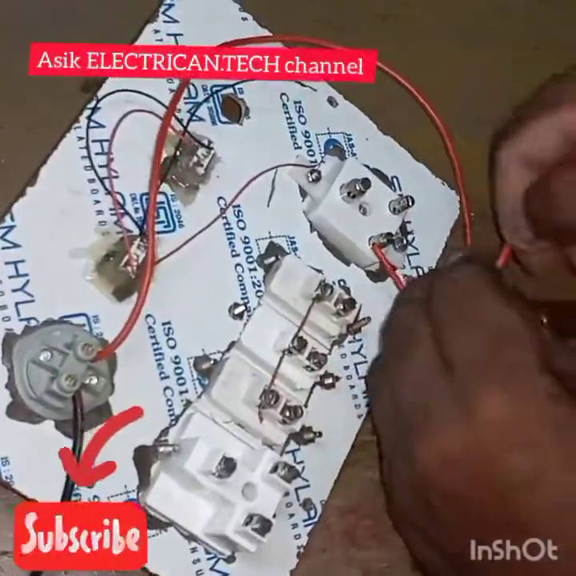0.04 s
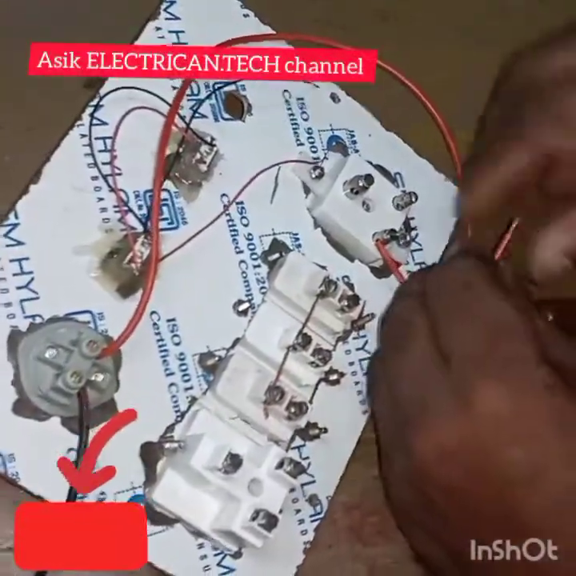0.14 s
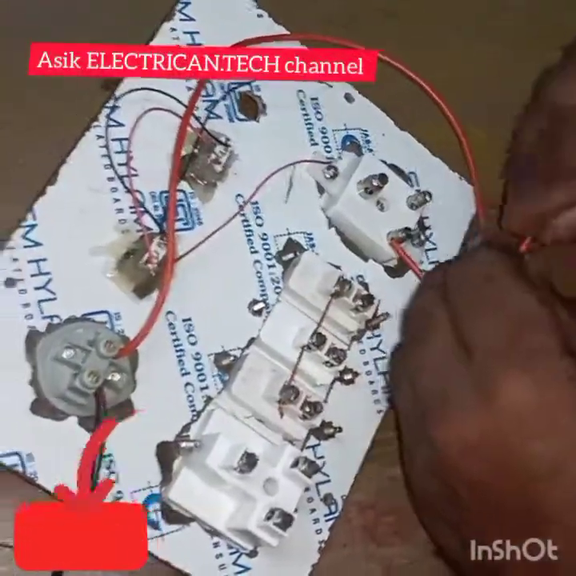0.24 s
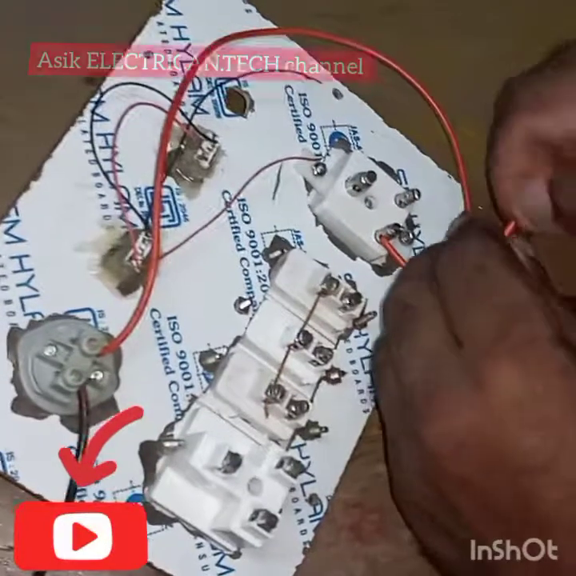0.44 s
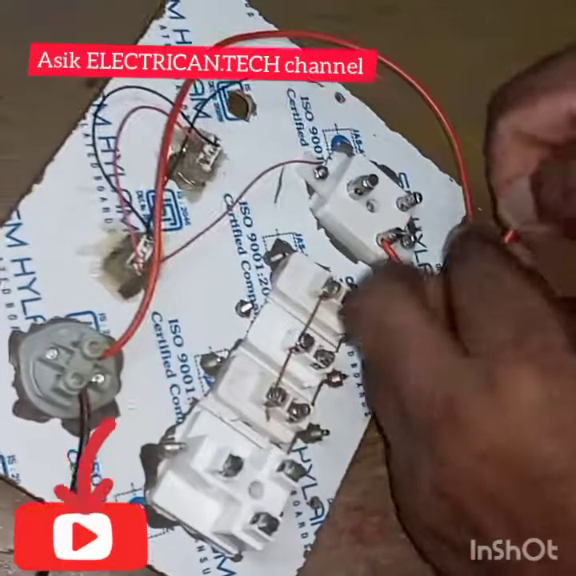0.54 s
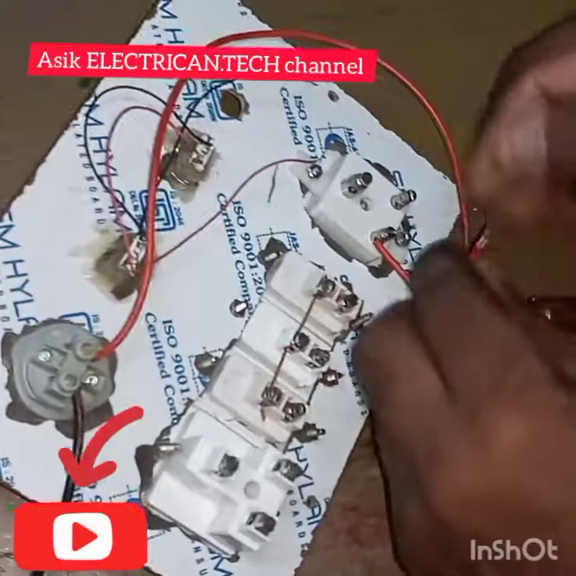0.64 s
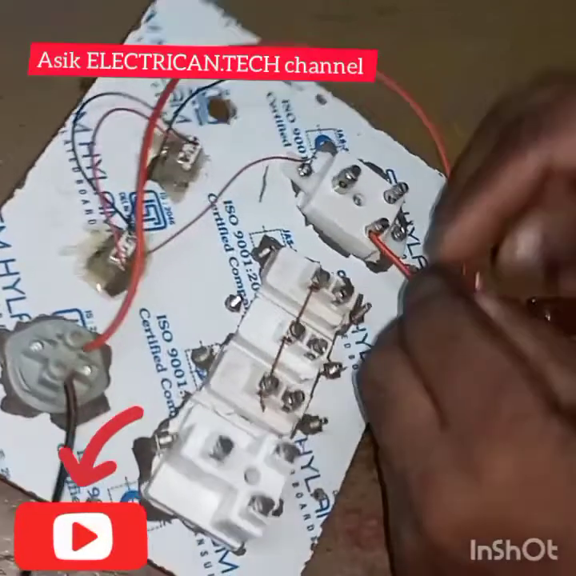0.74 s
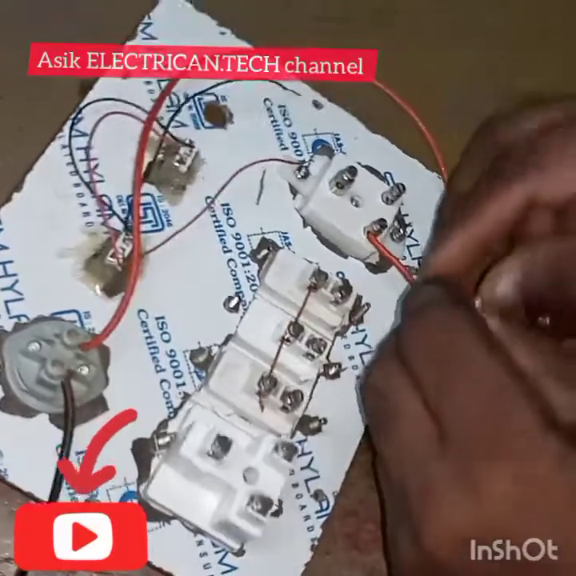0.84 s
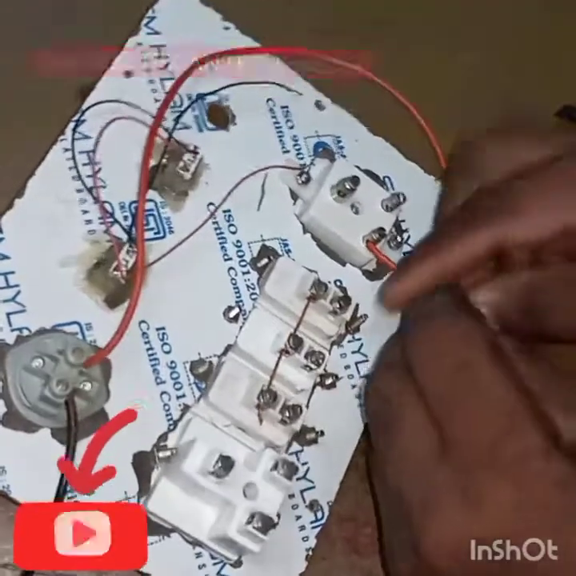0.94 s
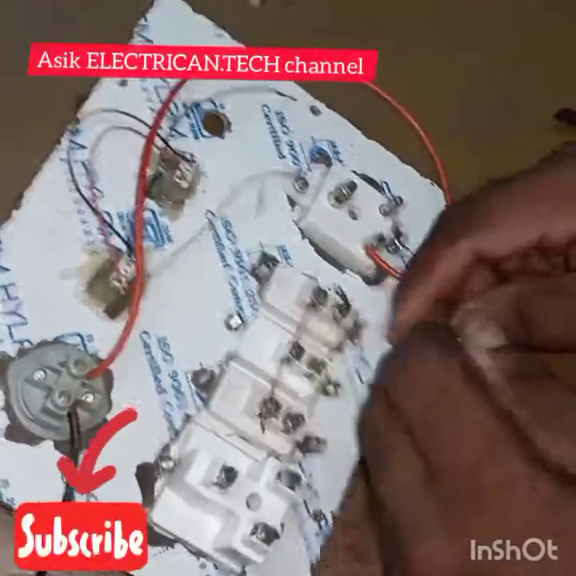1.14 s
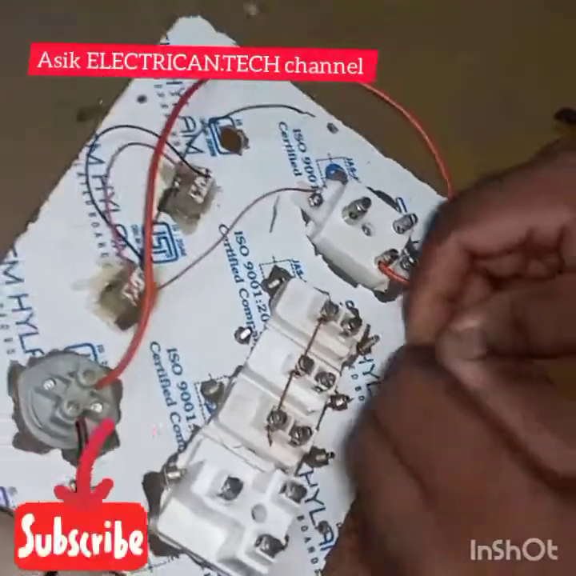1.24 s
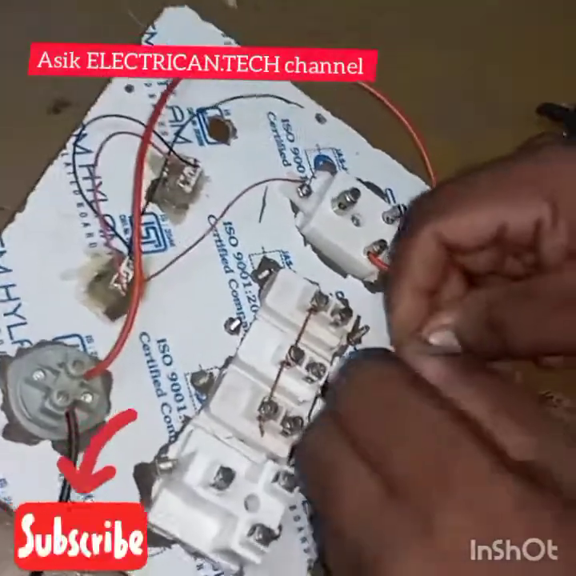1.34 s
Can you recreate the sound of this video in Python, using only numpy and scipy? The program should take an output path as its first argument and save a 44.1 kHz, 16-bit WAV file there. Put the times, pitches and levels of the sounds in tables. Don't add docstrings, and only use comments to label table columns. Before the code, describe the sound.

A stiff wire clicks and scrapes on a screw terminal, close up in a small bare room. Faint hiss and a dying clatter tail come first; a bright scrape and snaps at 0.2 seconds, a sharp tick at 0.39, then a dense burst of ticks, rasps and boomy table knocks from 0.57 to 0.9. Soft thumps fade until 1.2; faint ticks and rubbing near 1.35.

```python
import sys
import numpy as np
from scipy import signal
from scipy.fft import rfft, irfft
from scipy.io import wavfile
from scipy.ndimage import uniform_filter1d

SR = 44100
rng = np.random.default_rng(int(sys.argv[2]) if len(sys.argv) > 2 else 0)


def makeup_ratio(level_db):
    decades = np.asarray(level_db, float) / 20
    return 10 ** decades


def file_out(sig):
    cols = np.atleast_2d(sig).T
    lim = np.clip(cols, -1, 1)
    pcm = np.round(lim * 32767).astype(np.int16)
    wavfile.write(sys.argv[1], SR, pcm)


N = 61739
T = np.arange(N) / SR


def colour(x, points, sign=1):
    hz, db = np.array(points, float).T
    grid = np.arange(1025) * SR / 2048
    curve = np.interp(np.log(grid + 1), np.log(hz), db)
    cepstrum = irfft(sign * curve * np.log(10) / 20)
    cepstrum[1:1024] *= 2
    cepstrum[1025:] = 0
    response = irfft(np.exp(rfft(cepstrum)))
    return signal.fftconvolve(x, response)[:len(x)]


def resonate(x, hz, width):
    b, a = signal.iirpeak(hz, hz / width, SR)
    return signal.lfilter(b, a, signal.lfilter(b, a, x))


def dull(x, hz):
    return signal.lfilter(*signal.butter(2, hz, fs=SR), x)


def unit(x):
    return x / np.sqrt(np.mean(x ** 2))


def add(track, sound, s):
    i = int(s * SR)
    track[i:i + len(sound)] += sound[:len(track) - i]


# (frequency [Hz], level [dB per Hz])
HISS = [(30, -3.5), (150, -9), (800, -23), (3800, -25), (7400, -8.5), (9200, -27), (13000, -38),
        (15200, -41)]
HISS_DB, FLICKER_DB = -57, 1.2


def hiss():
    steps = np.repeat(rng.standard_normal(N // 1500 + 1), 1500)
    flicker = uniform_filter1d(steps, 1500)[:N]
    return makeup_ratio(HISS_DB + FLICKER_DB * flicker) * unit(colour(rng.standard_normal(N), HISS))


# (frequency [Hz], level [dB per Hz])
EARLIER = [(60, -19), (140, -5), (500, -36), (1200, -9), (1900, -18), (2500, -9), (3100, -5), (4200, -39)]
EARLIER_DB, EARLIER_T60_S = -54, 1


def earlier_tail():
    fade = makeup_ratio(EARLIER_DB - 60 * T / EARLIER_T60_S)
    return fade * unit(colour(rng.standard_normal(N), EARLIER))


def background():
    return hiss() + earlier_tail()


# (frequency [Hz], level [dB], t60 [s])
ROOM = [(354, -17.5, 0.41), (733, -24, 0.42), (1296, -34.5, 0.59), (3024, -32.5, 0.69), (4500, -33.5, 0.39),
        (7000, -48, 1), (9650, -40.5, 0.19), (14200, -32.5, .25)]
ROOM_GAP_S, ROOM_RISE_S = 0.0013, 0.002


def room(x):
    t = np.maximum(T[:SR] - ROOM_GAP_S, 0)
    tail = np.zeros(SR)
    for hz, db, t60 in ROOM:
        noise = resonate(rng.standard_normal(SR), hz, 0.81 * hz)
        tail += makeup_ratio(db - 60 * t / t60) * noise
    tail *= 1 - np.exp(-t / ROOM_RISE_S)
    return signal.fftconvolve(x, tail)[:N]


# (frequency [Hz], level [dB], t60 [s])
BOOM = [(64.8, 9.5, 0.44), (90, 0, 0.73), (121, 0.5, 0.66), (144.2, -8, 0.45), (185, -2, 0.34),
        (211.5, -2, 0.11), (285, -11, 0.36), (337.2, -11.5, 0.29), (433, -14.5, 0.15), (498, -8, 0.07),
        (637, -8, 0.089), (653, -11, 0.059)]
BOOM_DB = -8


def table_boom(push):
    boom = np.zeros(N)
    for k, (hz, db, t60) in enumerate(BOOM):
        mode = np.sin(2 * np.pi * hz * T) * makeup_ratio(-60 * T / t60)
        boom += (-1) ** k * makeup_ratio(db) * hz / SR * signal.fftconvolve(push, mode)[:N]
    return makeup_ratio(BOOM_DB) * boom


# (time [s], peak level [dB], push frequency [Hz], length [cycles])
KNOCKS = [(0.256, -39, 336, 1.07), (0.39, -31.5, 104, 1.08), (0.395, -41, 258, 0.56),
          (.423, -30, 119, 0.37), (0.54, -49, 98, 1.8), (0.568, -19.5, 153, 0.36), (0.566, -29, 357, 1.5),
          (.585, -25.5, 90, 0.98), (.6, -31.5, 480, 0.42), (.63, -27, 224, 0.38), (0.662, -34, 180, 0.66),
          (0.7, -24, 93, 0.4), (.715, -25, 176, 0.5), (0.736, -33, 181.4, 1.5), (0.706, -37.5, 460, 0.46),
          (0.454, -41.5, 197, 1.1), (0.782, -19, 153, 0.57), (0.799, -30.5, 121, 3.3),
          (.802, -31.5, 526, 0.68), (0.829, -39.5, 285, 0.61), (.864, -29, 90, 2.5), (0.917, -37.5, 425, 1),
          (0.939, -34, 197, 0.4), (0.974, -32, 121, 2.5), (1.03, -28, 121, 1.08), (1.09, -50, 121, 2.5),
          (1.125, -41.5, 339.5, 2.2), (1.149, -34.5, 183.8, 1.3), (1.191, -44.5, 102, 1.04),
          (1.21, -41, 173, 0.49)]
KNOCK_EDGE_DB = -5


def knocks():
    push, t = np.zeros(N), T[:5000]
    for s, db, hz, cycles in KNOCKS:
        u = t * hz / max(cycles, .3)
        swell = u * np.exp(1 - u)
        swing = np.sin(2 * np.pi * hz * t) / max(cycles, .5)
        add(push, makeup_ratio(db) * swell * swing, s - .002)
    return table_boom(push) + makeup_ratio(KNOCK_EDGE_DB) * push


# (frequency [Hz], level [dB per Hz])
CRACK = [(300, -21.5), (800, -20), (1700, 0), (3000, -4.5), (4500, 0), (8600, -2), (10000, -15.5),
         (16000, -28)]
CRACK_REACH, TOP_HZ = 2.27, 18000
GRAINS_PER_S = 2200


def wire_blows(rows, q, grain_db, rise_s, shape, spread):
    direct, send = np.zeros(N), np.zeros(N)
    t = T[:3000]
    click = 1. * (t == 0)
    grain = (t * GRAINS_PER_S).astype(int)
    for s, db, hz, length, crack_db in rows:
        length = max(length, .0005)
        noise, luck = rng.standard_normal((2, len(t)))
        fade = (1 - np.exp(-t / rise_s)) * np.exp(-(t / length) ** shape)
        run = noise * makeup_ratio(grain_db * luck[grain]) * fade
        size = makeup_ratio(db - 8) * np.sqrt(length * SR / len(t))
        for track, push in ((direct, run), (send, run if spread else click)):
            ring = resonate(push, hz, hz / q)
            crack = dull(colour(push, CRACK), min(hz * CRACK_REACH, TOP_HZ))
            add(track, size * (unit(ring) + makeup_ratio(crack_db) * unit(crack)), s)
    return np.array([direct, send])


# (time [s], level [dB], ring frequency [Hz], length [s])
SCRAPES = [(0.166, -50, 7200, 0.029), (0.185, -41, 7100, 0.031), (0.216, -34, 7600, 0.014),
           (.225, -43.5, 1276, 0.058), (0.232, -17.5, 6400, 0.0076), (0.242, -24, 6940, 0.013),
           (0.25, -49, 6900, 0.0081), (0.343, -44, 2750, 0.018), (.567, -22, 6760, 0.017),
           (0.249, -36.5, 2010, 0.014), (0.586, -18.5, 7010, 0.024), (0.586, -30, 5130, 0.015),
           (0.7048, -24, 6420, 0.015), (0.7814, -28.5, 1830, 0.0092), (0.798, -26, 6440, .017),
           (0.802, -37.5, 4500, 0.011), (1.318, -53, 1140, 0.061), (1.331, -49, 1520, 0.066),
           (1.347, -48, 2040, 0.018), (1.348, -49, 4010, 0.029)]
SCRAPE_AIR_DB = -12.5


def scrapes():
    rows = [(s, db, hz, length, SCRAPE_AIR_DB) for s, db, hz, length in SCRAPES]
    return wire_blows(rows, q=4.27, grain_db=-0.5, rise_s=0.00092, shape=3., spread=True)


# (time [s], level [dB], ring frequency [Hz], length [s], crack against ring [dB])
TICKS = [(.189, -47, 6900, 0.00057, -6), (.2154, -33, 7200, 0.00079, -13), (.237, -12, 7700, 0.0022, -7.5),
         (.2505, -17.5, 6850, 0.0047, -1.5), (.349, -35.5, 4700, 0.002, 0),
         (.3905, -14.5, 6360, 0.0057, 5.5), (.5672, -23, 1480, 0.006, 5.5), (.5945, -13, 6870, 0.0022, 2),
         (.609, -15.5, 7100, 0.0048, -13), (.700, -27, 1620, 0.0067, -0.5),
         (.7285, -20.5, 7000, 0.0068, -1.5), (.7996, -18, 6480, 0.008, -8),
         (.8015, -27.5, 1080, 0.0044, -9.5), (.8445, -23, 7400, 0.002, -4),
         (.905, -35.5, 3670, 0.0031, -18), (1.3424, -38.5, 4390, 0.0085, 0.5),
         (1.3717, -44.5, 1300, 0.013, 2.5)]


def ticks():
    return wire_blows(TICKS, q=2.07, grain_db=4.2, rise_s=0.00063, shape=1.4, spread=False)


def wire():
    return scrapes() + ticks()


# (frequency [Hz], level [dB])
PORTS = [(60, 4), (700, 2), (1300, 7), (4400, 8), (6500, 14), (8000, 22.5), (10800, -1.5), (15000, 5)]
LAG_S, LIKENESS = .00104, .75


def scene():
    (direct, send), knock = wire(), knocks()
    aside = LIKENESS * direct + np.sqrt(1 - LIKENESS ** 2) * wire()[0]
    left = direct + knock + room(send + makeup_ratio(-7) * knock) + makeup_ratio(1.5) * background()
    early = np.roll(aside + knock, -int(LAG_S * SR))
    right = early + room(send + makeup_ratio(-9) * knock) + background()
    return makeup_ratio(3.5) * np.array([left, colour(right, PORTS, sign=-1.09)])


# (frequency [Hz], level [dB])
MIC = [(8700, -1), (10000, -6.5), (13600, -6), (15000, 5.5)]


def microphones(dry):
    rumble_cut = signal.butter(3, 52, "high", fs=SR, output="sos")
    return signal.sosfilt(rumble_cut, [colour(port, MIC) for port in dry])


DUCK_DB, DUCK_AHEAD_S = -5, .011


def gain_control(x):
    level = 10 * np.log10(uniform_filter1d(np.diff(x[0], prepend=0) ** 2, 200) + 1e-12)
    jump = np.roll(level, -int(DUCK_AHEAD_S * SR)) - level
    dip = uniform_filter1d(np.clip((jump - 16) / 8, 0, 1), 150)
    return x * makeup_ratio(DUCK_DB * dip)


def roll_off(x):
    return signal.sosfilt(signal.butter(12, 16960, fs=SR, output="sos"), x)


def record(dry):
    x = gain_control(microphones(dry))
    ceiling = .9
    x = ceiling * np.tanh(x / ceiling)
    x = signal.sosfilt(signal.ellip(8, .2, 60, 15900, fs=SR, output="sos"), x)
    return roll_off(x)


dry = scene()
out = record(dry)
file_out(out)
```